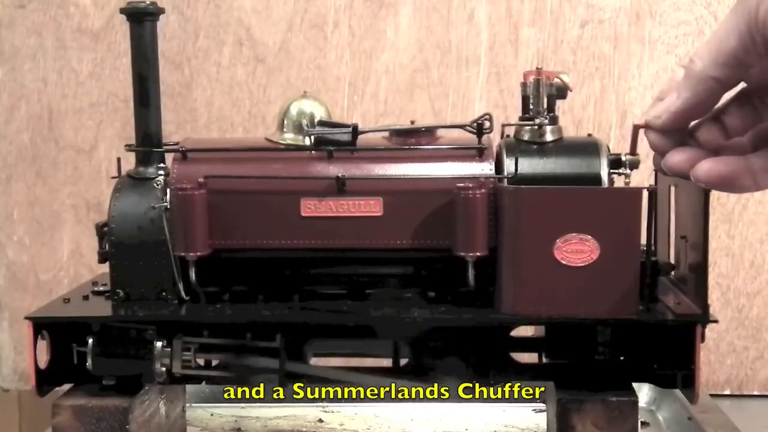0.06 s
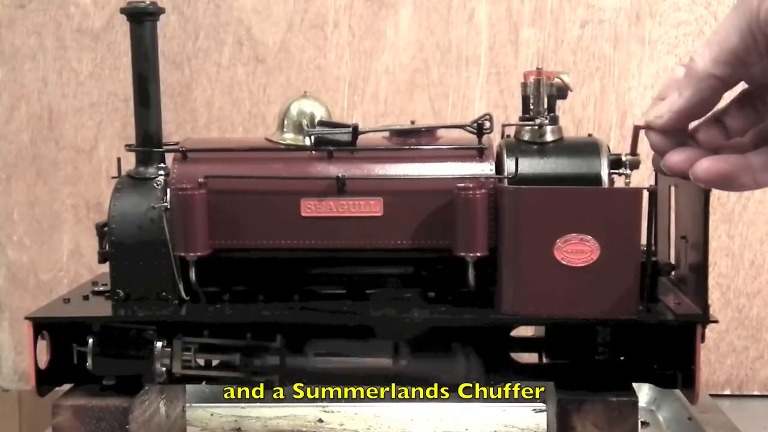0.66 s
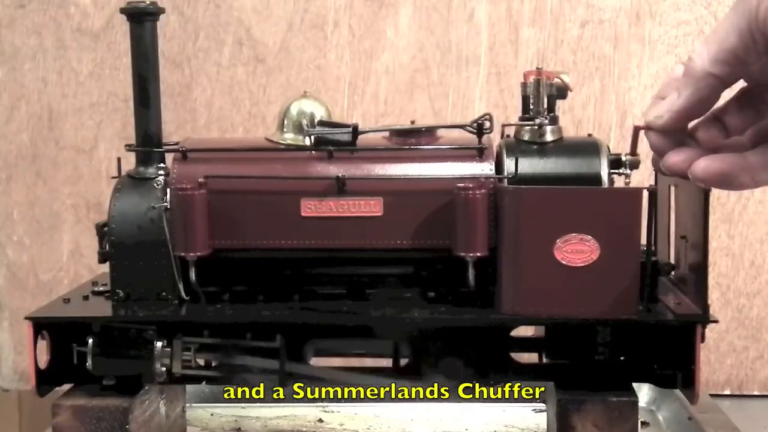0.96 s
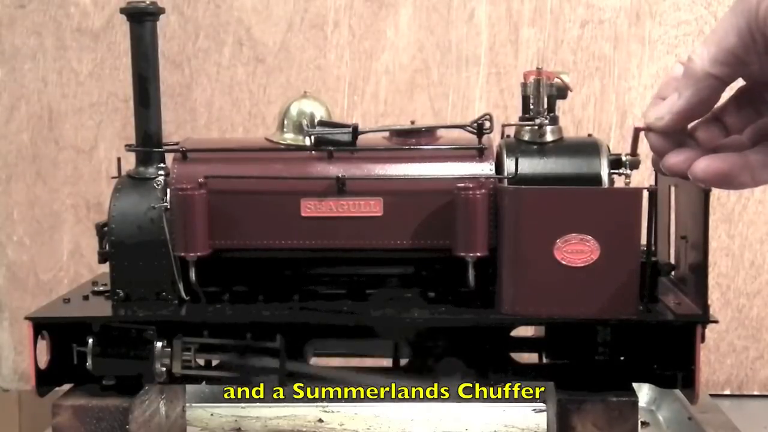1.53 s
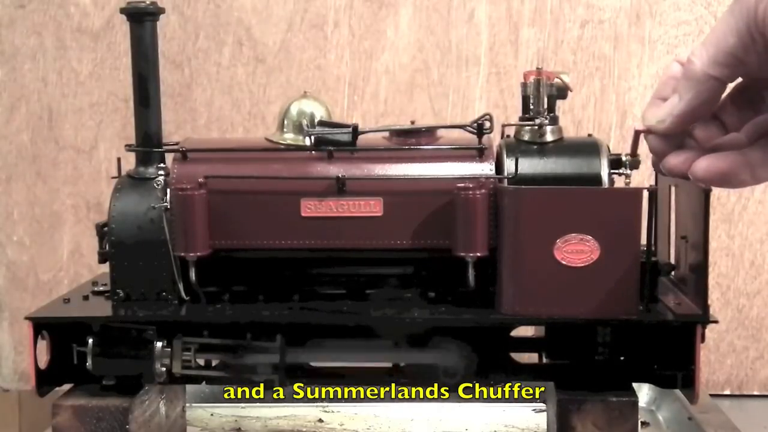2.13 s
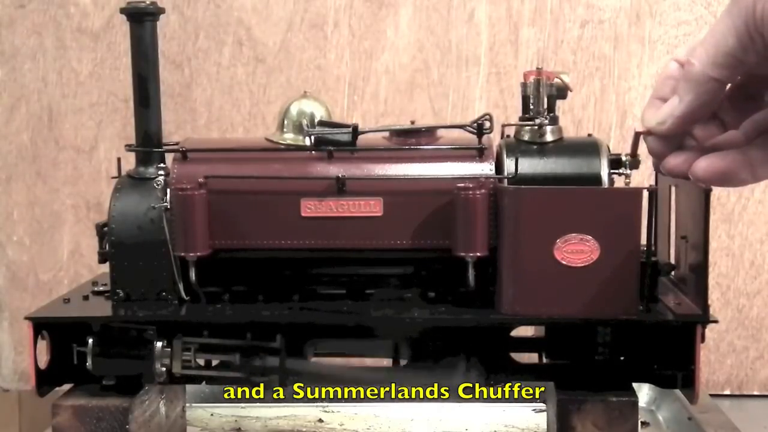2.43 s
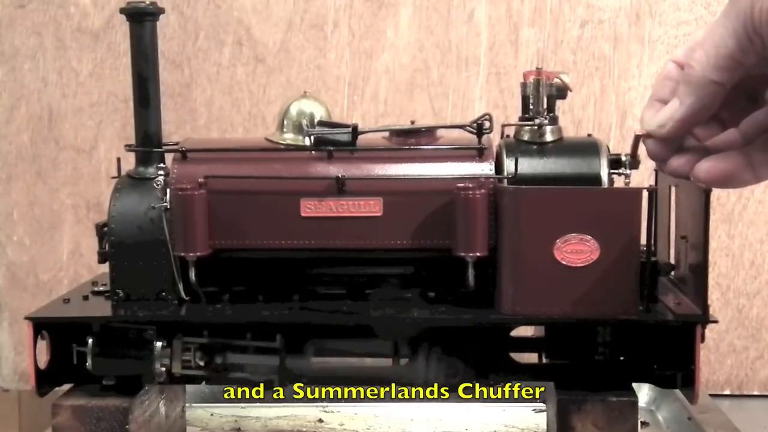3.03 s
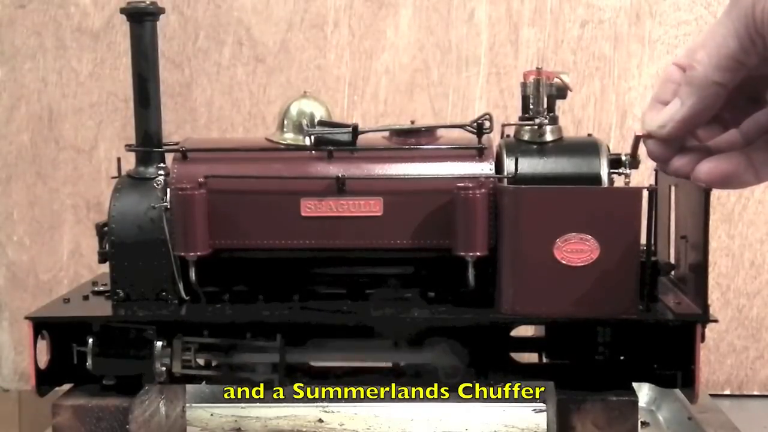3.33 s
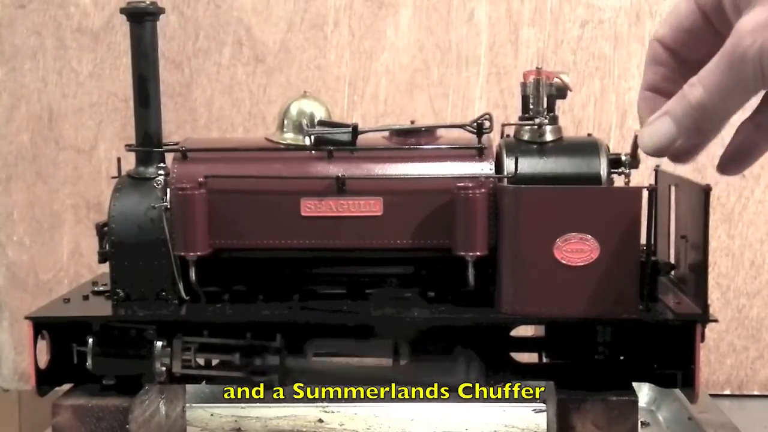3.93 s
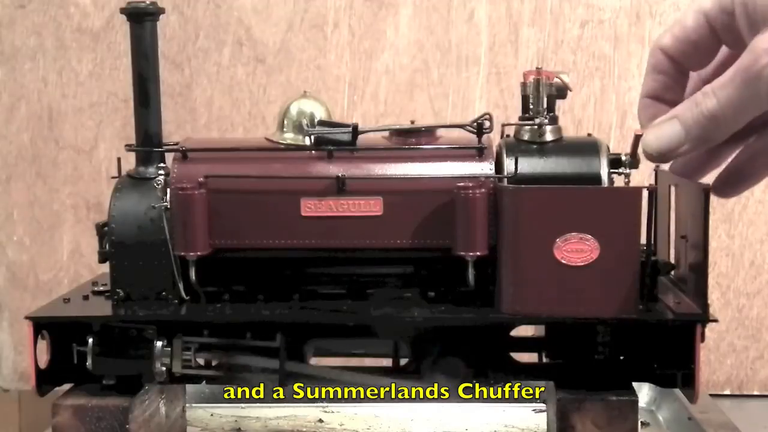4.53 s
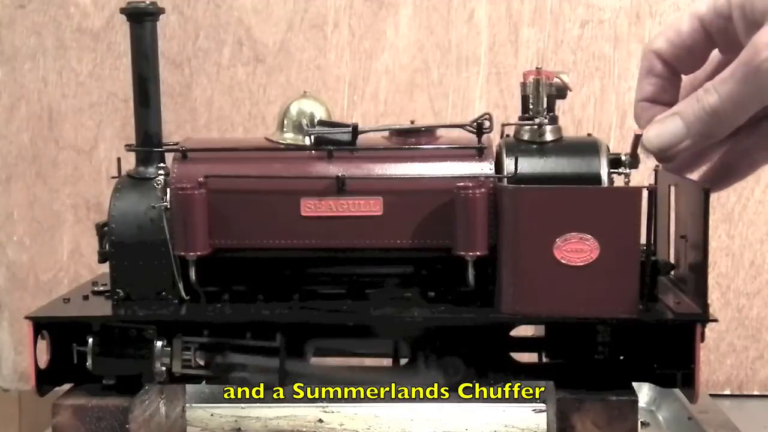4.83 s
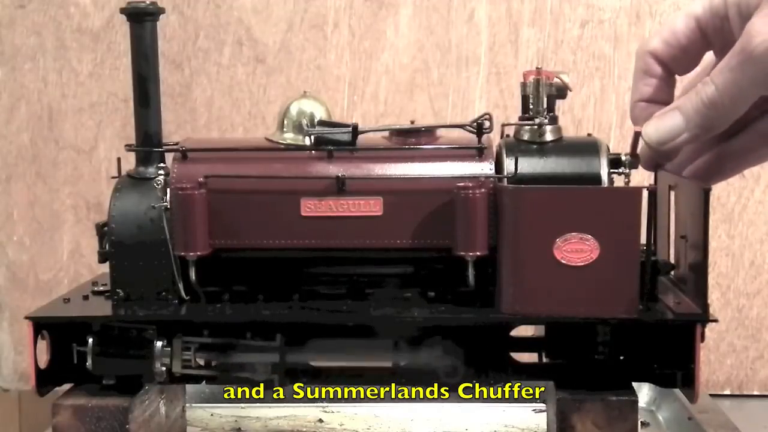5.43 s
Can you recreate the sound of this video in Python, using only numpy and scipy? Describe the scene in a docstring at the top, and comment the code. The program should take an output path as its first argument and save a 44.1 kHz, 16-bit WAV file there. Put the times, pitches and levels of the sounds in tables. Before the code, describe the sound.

Rapid hissing chuffs pour without a break from a model steam locomotive, wet and slightly sputtering, with a high, airy whistle in each puff. The pace rises a little past the middle, and a few tiny, bright spits of water come through. The moving gear rumbles faintly below. It is heard close up, in stereo, on a bench in a small workshop.

```python
"""Quick, hissing chuffs with a whistling edge: a model steam locomotive running on a workshop bench.
Four chuffs of wet steam a wheel turn blow through a whistle-like pipe in the chimney, rising from
about 22 to 25 a second as a hand eases the regulator. Now and then a drop of condensate spits.
The stereo microphone also takes in the bench, the plywood wall behind and the short ring of the
small room; the running gear rumbles faintly underneath."""
import sys
import numpy as np
from scipy.fft import rfft, irfft, next_fast_len
from scipy.io import wavfile
from scipy.ndimage import uniform_filter1d

SR = 44100
rng = np.random.default_rng(int(sys.argv[2]) if len(sys.argv) > 2 else 0)


def log_audio(samples):
    """Write samples as a 16-bit WAV file to the path given in sys.argv[1]."""
    # one column per channel
    frames = np.atleast_2d(samples).T
    # limit to full scale, then quantise
    limited = np.clip(frames, -1, 1)
    pcm = np.round(limited * 32767).astype(np.int16)
    wavfile.write(sys.argv[1], SR, pcm)


N = 246519
TIME = np.arange(N) / SR
SIZE = next_fast_len(N + SR)
HZ = np.maximum(np.arange(SIZE // 2 + 1) * SR / SIZE, 1)
SIDES = np.array([[.5], [-.5]])  # left, right

# wheel speed as the regulator is eased open: t/s, speed/(turns per s)
WHEEL_SPEED = [(0, 5.475), (.8, 5.374), (1.2, 5.566), (1.9, 5.612), (3.1, 5.956), (3.4, 6.282),
               (3.7, 6.094), (5.6, 6.314)]
# where each exhaust port opens, the valves set a little unevenly: angle/turns
PORT_ANGLES = [0, .258, .503, .735]
# strength of each port's chuff, the second the weakest: level/dB
PORT_LEVELS = [0.23, -1.7, 0.63, 0.73]
# steam flow through one chuff: position/chuffs, level/dB
CHUFF_SHAPE = [(0, -6.5), (.1, -1), (.2, 2.2), (.42, 1.5), (.7, -.5), (.85, -5.5), (1, -6.5)]
# spectrum of the jet's broad hiss: f/Hz, level/dB
JET_SPECTRUM = [(200, -110), (450.0, -89), (900.0, -83.5), (1150.0, -66.5), (1600.0, -71.5),
                (2500.0, -54.5), (3300.0, -55.5), (3900.0, -67), (5400.0, -80.5), (6800.0, -65),
                (7600.0, -82.5), (10500.0, -82.5), (14500.0, -86.5)]
# where the hiss sits in the stereo image: f/Hz, left minus right/dB
JET_PAN = [(1000.0, 2.5), (2500.0, -0.8), (3400.0, -0.3), (4800.0, -1.9), (6200.0, 7.1), (14000.0, -1.0)]
# resonances of the exhaust pipe and chimney: f/Hz, width/Hz, level/dB, left minus right/dB
PIPE_MODES = [(704.5, 125, -74.5, -3.5), (777.6, 37, -66.5, 0.7), (1291, 60, -64.5, 1),
              (1734, 122, -56.5, -3), (1990, 131, -41, -4), (2198, 146, -46.5, -7), (2555, 153, -48.5, -6),
              (3078, 160, -49.5, -2.5), (3368, 79, -52, -7.5), (4339, 360, -55, -5), (6290, 176, -66, 8),
              (8376, 300, -73.5, 22), (9357, 420, -62, -2.6), (12830, 540, -78, 16)]
# drops of condensate spat out with the steam: t/s, centre f/Hz, level/dB
DROPS = [(.101, 11000, -34), (1.773, 11500, -30), (2.117, 6800, -21), (2.834, 6650, -26),
         (3.329, 6400, -27)]
# spectrum of the fine spray above the chimney: f/Hz, level/dB
PLUME_SPECTRUM = [(600, -110), (1500, -64), (3000, -64.5), (5400, -74.5), (6500, -78), (7600, -88),
                  (9500, -69.5), (13000, -78.5), (15000, -100)]
# drift of the steam's treble: t/s, level around 6 kHz/dB, level above 8 kHz/dB
TREBLE_DRIFT = [(0, 1.5, -0.5), (.8, -0.5, -2.3), (2.45, -0.2, -2.8), (2.9, 2.7, -0.7), (3.55, -0.2, -0.5),
                (4.25, 2.9, -1.5), (4.6, 1.7, -2.3), (5.59, -.4, -3)]
# distinct reflections off the engine, bench and wall: delay/s, left gain, right gain
NEAR_REFLECTIONS = [(0.0002, 0.53, 0.6), (0.001073, -0.07, 0.25), (0.002587, 0.07, -0.14),
                    (0.003563, -0.21, -0.03), (0.008143, 0.13, 0.02)]
# spectrum of the rumble from running gear and bench: f/Hz, level/dB
GEAR_SPECTRUM = [(15, -99), (55, -88), (115, -90), (148, -82), (175, -82), (200, -81.5), (290, -77.5),
                 (430, -86.5), (600, -83), (1200, -112)]
# slow swell of the rumble: t/s, level/dB
GEAR_SWELL = [(0, 1.5), (.7, -1), (2.6, 0.5), (3.2, .5), (3.6, -2.5), (4.6, -0.5), (5.59, -4.5)]
# stereo width of the rumble: f/Hz, side minus mid/dB
GEAR_WIDTH = [(30, -9), (80, -9.5), (140, -15), (500, -14)]
# narrow dips in the microphone's treble: f/Hz, width/Hz
MIC_DIPS = [(7890, 250), (8820, 200), (11680, 610)]


def exhaust(flow, pipe_db, sputter_db, sputter_per_s, hiss_throb, pipe_throb):
    """At the chimney the turbulent jet hisses and sounds the pipe; water in the steam makes it sputter."""
    sputter = from_db(sputter_db * flutter(sputter_per_s))
    jet = white() * rms_one(sputter * flow ** hiss_throb)
    hiss = filtered(jet, from_db(over_hz(JET_SPECTRUM) + SIDES * over_hz(JET_PAN)))
    pipe = sum(from_db(db + SIDES * pan_db) * whistle(hz, width, saturation=0.36, unrest_db=1.55)
               for hz, width, db, pan_db in PIPE_MODES)
    # the air in the pipe takes a few milliseconds to follow the jet
    drive = uniform_filter1d(np.sqrt(sputter) * flow ** pipe_throb, size=130)
    return hiss + from_db(pipe_db) * pipe * rms_one(drive)


def steam_flow(start_turns, spread_db):
    """Four times a wheel turn a port opens sharply, empties its cylinder and closes before the next."""
    turns = start_turns + np.cumsum(over_time(WHEEL_SPEED)) / SR
    openings = (np.arange(int(turns[-1]) + 2)[:, None] + PORT_ANGLES).ravel()
    chuff_count = np.interp(turns, openings, np.arange(len(openings)))
    strength_db = np.resize(PORT_LEVELS, len(openings)) + spread_db * rng.standard_normal(len(openings))
    shape_db = np.interp(chuff_count % 1, *np.transpose(CHUFF_SHAPE))
    flow = from_db(strength_db[chuff_count.astype(int)] + shape_db)
    return uniform_filter1d(flow, size=88)


def whistle(hz, width, saturation, unrest_db):
    """One pipe mode fed by eddies of its own; its swing saturates, which partly evens out its level."""
    tone = filtered(white(), resonance(hz, width) ** 2)
    swing = np.sqrt(uniform_filter1d(rms_one(tone) ** 2, size=1100) + 1e-3)
    # the eddies grow and fade within hundredths of a second
    moments = np.arange(0, N / SR, .012)
    unrest = np.interp(TIME, moments, from_db(unrest_db * rng.standard_normal(len(moments))))
    return tone.std() * rms_one(unrest * tone / swing ** saturation)


def spits(decay_s, width_hz):
    """Each drop of condensate bursts in a brief, bright hiss."""
    bursts = np.zeros(N)
    for start_s, hz, db in DROPS:
        envelope = (TIME >= start_s) * np.exp(-np.abs(TIME - start_s) / decay_s)
        hiss = rms_one(filtered(white(), resonance(hz, width_hz) ** 2))
        bursts += from_db(db) * envelope * hiss
    return bursts


def plume(flow, throb):
    """Above the chimney the steam breaks up: a soft hiss, wide in the image, that follows the chuffs."""
    spray = np.array([white(), white()]) * flow ** throb
    return filtered(spray, from_db(over_hz(PLUME_SPECTRUM)))


def treble_drift(steam, split_hz, top_hz):
    """The treble of the steam slowly swells and fades in two bands."""
    times, high_db, top_db = np.transpose(TREBLE_DRIFT)
    top = filtered(steam, 1 / (1 + (top_hz / HZ) ** 12))
    high = filtered(steam, 1 / (1 + (split_hz / HZ) ** 12)) - top
    high_gain = from_db(np.interp(TIME, times, high_db))
    top_gain = from_db(np.interp(TIME, times, top_db))
    return steam + high * (high_gain - 1) + top * (top_gain - 1)


def workshop(steam, right_lag_s, early_db, clutter_db, room_db):
    """Paths to the microphone: direct, off nearby surfaces and bench clutter, and round the room."""
    paths = np.exp(-2j * np.pi * HZ * np.array([[0], [right_lag_s]]))
    for delay, left, right in NEAR_REFLECTIONS:
        paths += np.array([[left], [right]]) * np.exp(-2j * np.pi * HZ * delay)
    paths += from_db(early_db) * scatter(t60_s=0.089, alike_below_hz=1100)
    # small parts scatter only the short waves
    short_waves = 1 / (1 + (2600 / HZ) ** 8)
    paths += from_db(clutter_db) * short_waves * scatter(t60_s=0.07, alike_below_hz=1840)
    paths += from_db(room_db) * scatter(t60_s=.25, alike_below_hz=1550)
    return filtered(steam, paths)


def scatter(t60_s, alike_below_hz):
    """Response of dense, dying reflections; long waves reach both sides of the microphone alike."""
    tails = rng.standard_normal((2, N)) * from_db(-60 * TIME / t60_s) * (TIME > .003)
    tails /= np.sqrt(np.sum(tails ** 2, axis=1, keepdims=True))
    mid, side = rfft(tails, SIZE)
    alike = 1 / (1 + (HZ / alike_below_hz) ** 4)
    return np.sqrt((1 + alike) / 2) * mid + np.sqrt((1 - alike) / 2) * side * 2 * SIDES


def running_gear(flow, throb):
    """Down at the bench, a faint rumble that pulses slightly with the piston strokes."""
    side = filtered(white(), from_db(over_hz(GEAR_WIDTH))) * 2 * SIDES
    mid = white() * flow ** throb
    return from_db(over_time(GEAR_SWELL)) * filtered(mid + side, from_db(over_hz(GEAR_SPECTRUM)))


def resonance(hz, width):
    """Response of one damped mode, 1 at its peak."""
    return 1 / (1 + 1j * (HZ / hz - hz / HZ) * hz / width)


def flutter(per_s):
    """Smooth random motion of spread 1."""
    slow = filtered(white(), 1 / (1 + (HZ / per_s) ** 2))
    return slow / slow.std()


def white():
    """Noise of 0 dB per Hz."""
    return rng.standard_normal(N) * np.sqrt(SR / 2)


def filtered(x, response):
    """Pass a sound through a frequency response."""
    return irfft(rfft(x, SIZE) * response, SIZE)[..., :N]


def over_hz(points):
    """Join (f/Hz, value) points on a log-frequency axis."""
    hz, value = np.transpose(points)
    return np.interp(np.log(HZ), np.log(hz), value)


def over_time(points):
    """Join (t/s, value) points with straight lines."""
    return np.interp(TIME, *np.transpose(points))


def from_db(db):
    """Decibels to gain."""
    return 10 ** (np.asarray(db) / 20)


def rms_one(x):
    """Scale to unit power."""
    return x / np.sqrt(np.mean(x ** 2))


def scene():
    """At the workshop bench: the exhaust and its plume up front, the rumble of the gear underneath."""
    flow = steam_flow(start_turns=.034, spread_db=0.45)
    # a throb is the exponent on the flow: the higher it is, the deeper the layer pulses
    steam = exhaust(flow, pipe_db=1.0, sputter_db=3.0, sputter_per_s=96, hiss_throb=0.36, pipe_throb=0.74)
    steam += spits(decay_s=0.0064, width_hz=3600)
    steam = workshop(steam, right_lag_s=.000038, early_db=-18.5, clutter_db=-5, room_db=-8.5)
    steam += plume(flow, throb=0.52)
    return treble_drift(steam, split_hz=4340, top_hz=7800) + running_gear(flow, throb=0.092)


def record(dry):
    """The microphone rounds the highest peaks, has three narrow treble dips and cuts the very top."""
    ceiling, cutoff_hz = .95, 14700
    rounded = dry / (1 + (dry / ceiling) ** 8) ** (1 / 8)
    dips = np.prod([1 - resonance(hz, width) for hz, width in MIC_DIPS], axis=0) ** 2
    return filtered(rounded, dips / np.sqrt(1 + (HZ / cutoff_hz) ** 160))


dry = scene()
out = record(dry)
log_audio(out)
```